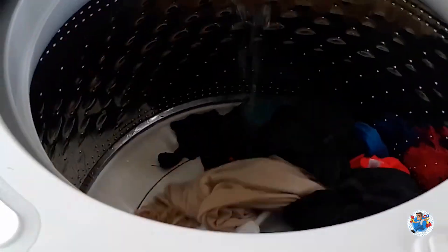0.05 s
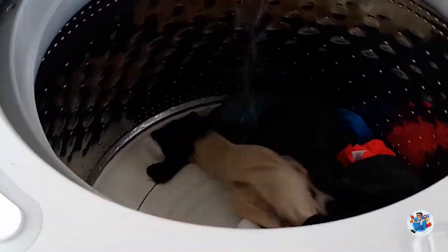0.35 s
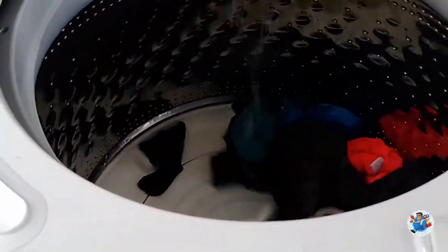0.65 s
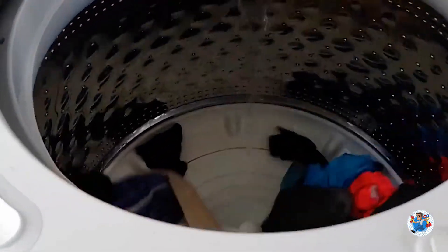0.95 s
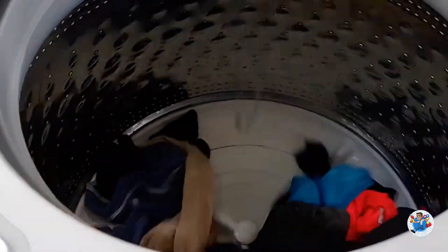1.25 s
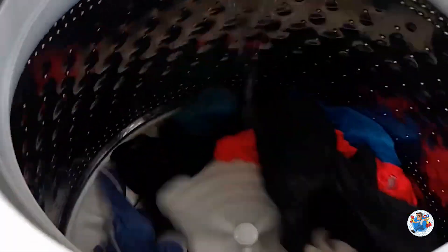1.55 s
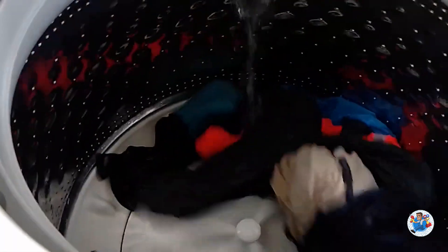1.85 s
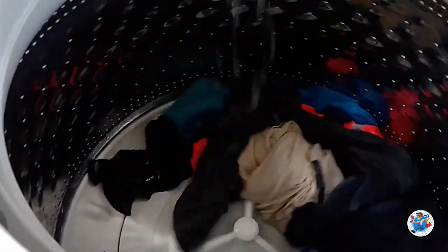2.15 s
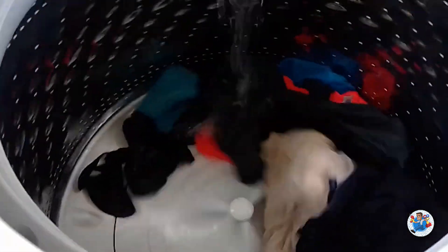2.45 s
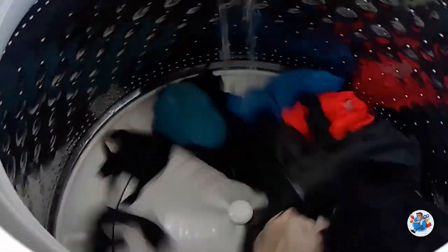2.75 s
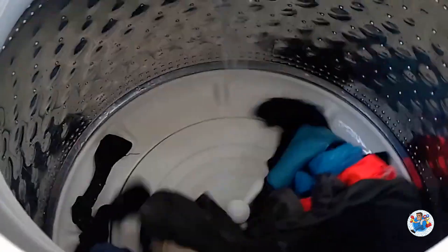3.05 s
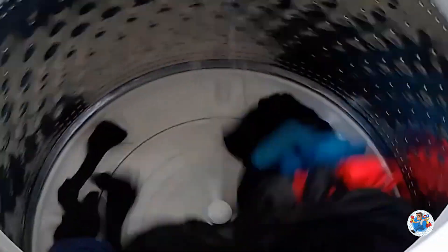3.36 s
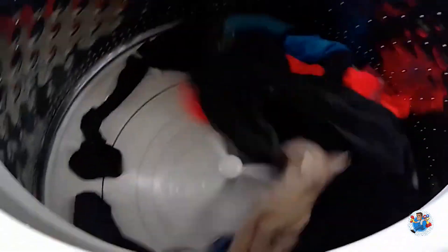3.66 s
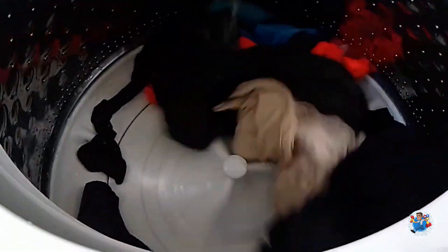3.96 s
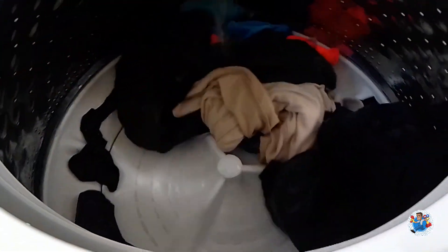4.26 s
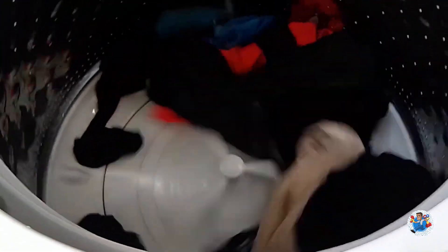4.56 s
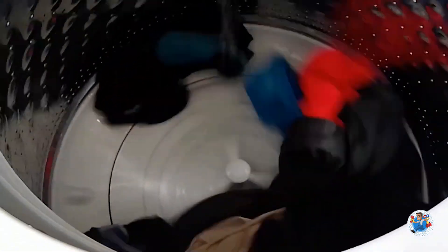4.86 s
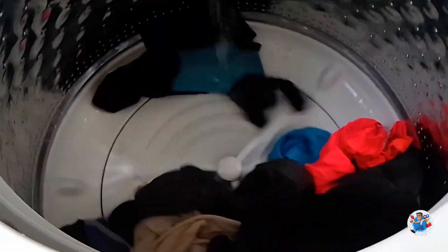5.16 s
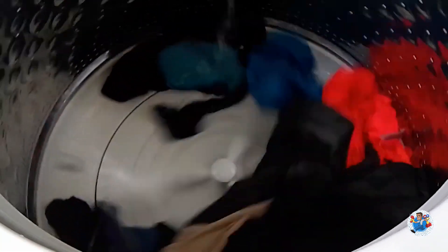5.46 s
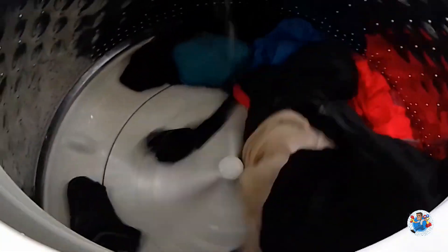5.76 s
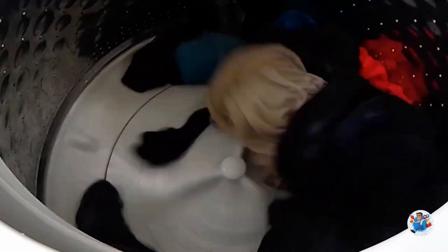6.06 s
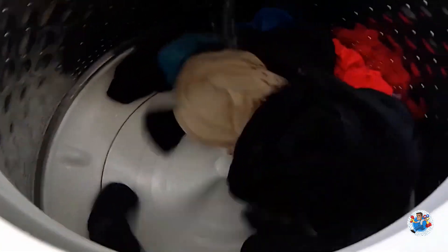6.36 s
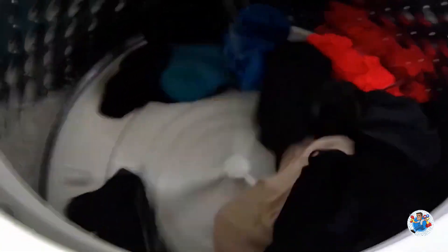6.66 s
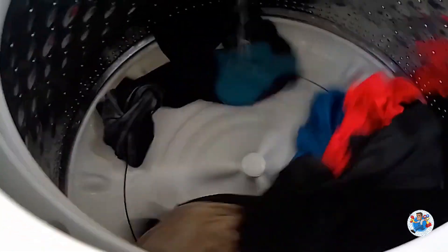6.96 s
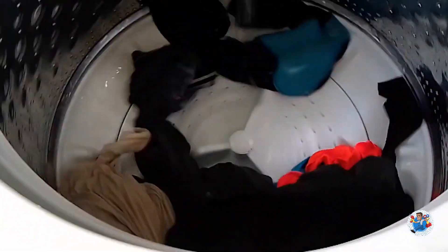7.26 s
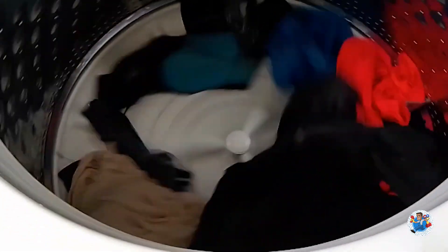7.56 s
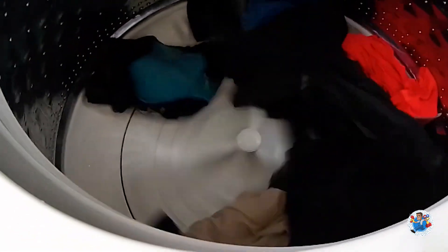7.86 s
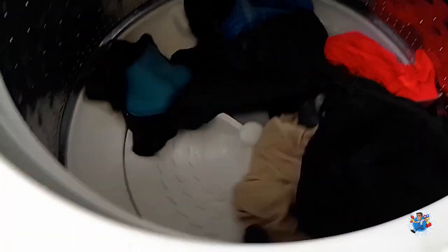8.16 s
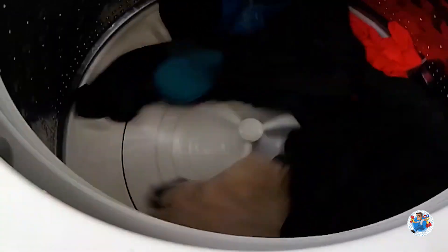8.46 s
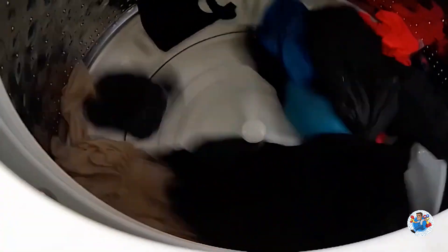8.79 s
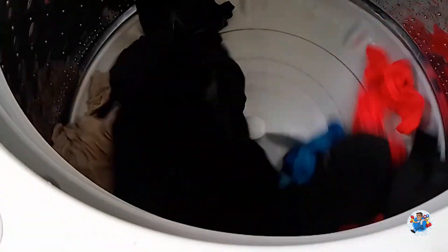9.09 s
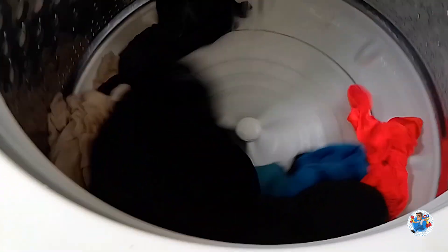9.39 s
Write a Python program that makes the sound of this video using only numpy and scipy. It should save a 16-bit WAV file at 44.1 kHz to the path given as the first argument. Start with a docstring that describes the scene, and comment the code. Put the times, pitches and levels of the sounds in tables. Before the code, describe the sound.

Water streams into a top-loading washing machine, pattering and slapping on wet clothes and the steel tub with tiny bubbly plips. Underneath, the motor drones and grinds in strokes about once a second, with light sloshing and a soft clunk at some reversals. Now and then wet laundry thuds dully against the wall. It is all heard from close above the open tub.

```python
"""Water pours into a top-loading washing machine. The stream breaks into drops that patter and slap
on wet clothes and the steel tub, trapping small bubbles that ring.
Underneath, the wash plate swings to and fro, one stroke a second. Its drive hums and grinds through
the tub and clunks when it reverses; the water sloshes, and now and then wet clothes thud on the wall."""
import sys
import numpy as np
from scipy import signal
from scipy.fft import rfft, irfft, next_fast_len
from scipy.io import wavfile
from scipy.ndimage import uniform_filter1d, minimum_filter1d

SR = 44100
rng = np.random.default_rng(int(sys.argv[2]) if len(sys.argv) > 2 else 0)


def dump_mix(stems):
    """Bounce the given channels to the path in sys.argv[1] as a 16-bit WAV at rate SR."""
    frames = np.atleast_2d(stems).T  # one column per channel
    limited = np.clip(frames, -1, 1)  # hard clip at full scale
    pcm = np.round(limited * 32767).astype(np.int16)
    wavfile.write(sys.argv[1], SR, pcm)


N = 420273

# each swing of the wash plate: (start [s], time driven [s], drone [dB], rasp [dB], clunk [dB])
STROKE_PLAN = [(-0.64, .71, -29, -32.5, -54), (0.362, .72, -27, -31.5, -52), (1.365, .72, -27.5, -31, -46),
               (2.366, .76, -26.5, -30, -46), (3.375, .72, -28.5, -31.5, -54),
               (4.362, .74, -28, -29.5, -44), (5.38, .7, -28, -30.5, -39), (6.378, .7, -28, -29, -49),
               (7.38, .7, -27, -30, -40), (8.379, .7, -26, -27.5, -58), (9.398, .7, -27, -30, -40)]
# the tone colour of the drive's rasp, heard through the tub: (frequency [Hz], level [dB])
RASP_COLOUR = [(300, -44), (440, -5), (505, 3), (555, -1), (595, 2), (660, 1.5), (735, -1.5), (770, -5.5),
               (1050, -6), (1300, -8.5), (2000, -11.5), (3500, -16.5), (8000, -50)]
# the tone colour of drops landing in shallow water: (frequency [Hz], level [dB])
PUDDLE_COLOUR = [(100, -60), (400, 2), (800, 16), (1500, 4), (2100, -0.5), (2800, 4.5), (3600, -1.5),
                 (5000, 10.5), (9000, -30), (16000, -30)]
# how loud the spray is as clothes pass under the stream: (time [s], level [dB])
SPRAY_LOUDNESS = [(0.0, -25.5), (0.16, -30.5), (0.28, -23.0), (0.6, -27.5), (1.04, -24.0), (1.4, -24.5),
                  (1.88, -28.5), (2.0, -24.0), (2.36, -29.5), (2.48, -24.5), (3.0, -28.0), (3.6, -21.0),
                  (3.68, -29.0), (4.4, -25.5), (5.0, -29.0), (5.56, -29.5), (5.68, -21.0), (6.4, -30.0),
                  (6.52, -25.0), (7.04, -28.0), (7.72, -23.5), (8.28, -27.0), (9.32, -23.5), (9.52, -27.0)]


def amp(db):
    """Turn decibels into a number to multiply by."""
    return np.exp(np.asarray(db) * np.log(10) / 20)


def unit(x):
    """Scale each sound to an average strength (rms) of 1."""
    return x / np.sqrt(np.mean(x ** 2, axis=-1, keepdims=True) + 1e-20)


def curve(points):
    """Join (time, value) points with straight lines, one value per sample."""
    return np.interp(np.arange(N) / SR, *np.transpose(points))


def wobble(rate):
    """A smooth curve through `rate` random values a second."""
    fine = signal.resample_poly(rng.standard_normal(int(N * rate / SR) + 4), 8, 1)
    return np.interp(np.arange(N) * 8 * rate / SR, np.arange(len(fine)), fine)


def gains(colour, size):
    """Turn (Hz, dB) points into a gain for every frequency in a sound of `size` samples."""
    hz, db = np.transpose(colour)
    return amp(np.interp(np.log(np.fft.rfftfreq(size, 1 / SR) + 1), np.log(hz), db))


def noise(colour):
    """Steady noise with the given tone colour."""
    size = next_fast_len(N)
    return unit(irfft(rfft(rng.standard_normal(size)) * gains(colour, size), size)[:N])


def tone(hz, drift, drift_rate):
    """A tone that wavers slightly; drift is how far its phase wanders, in radians."""
    return np.sqrt(2) * np.sin(2 * np.pi * hz * np.arange(N) / SR + drift * wobble(drift_rate))


def burst(t, rise, t60):
    """Swell to 1 in `rise` seconds, then fade by 60 dB every `t60` seconds."""
    return np.minimum(t / rise, 1) ** 2 * amp(-60 * np.maximum(t - rise, 0) / t60)


def place(times, sounds):
    """Add each row of sound at its time, which may be up to a second before the start."""
    at = np.round((np.asarray(times) + 1) * SR).astype(int)[:, None] + np.arange(sounds.shape[1])
    return np.bincount(at.ravel(), sounds.ravel(), N + SR)[SR:SR + N]


def impact_noise(colour, centre_hz, octaves, size=1536):
    """One row of noise per impact, stressed around its own centre frequency."""
    hz = np.fft.rfftfreq(size, 1 / SR) + 1
    stress = 1 / np.sqrt(1 + (np.log2(hz / centre_hz[:, None]) / octaves) ** 2)
    white = rng.standard_normal((len(centre_hz), size))
    return unit(irfft(rfft(white) * gains(colour, size) * stress))


def chirps(pitch_hz, cycles, glide, size=1024):
    """Bubbles ring, loudest after `cycles` vibrations, and glide upward through pitch_hz."""
    turns = pitch_hz[:, None] * np.arange(size) / SR
    age = turns / cycles
    rising = np.minimum(age, 2)
    phase = turns + glide * cycles * (rising ** 2 / 2 - rising + np.maximum(age - 2, 0))
    return age * np.exp(1 - age) * np.sin(2 * np.pi * phase)


def fizz(low_hz, span, cycles, spread_db, count):
    """A crowd of tiny bubbles, pitched from low_hz up to `span` times that."""
    when, pitch, size = rng.random((count, 3)).T
    rings = chirps(low_hz * span ** pitch, cycles, glide=0.12, size=640)
    return unit(place(when * N / SR, amp(spread_db * size ** 2)[:, None] * rings))


def plate_swing():
    """At each sample: the plate's speed (0-1), its stroke's age (s), drone (dB) and rasp (dB)."""
    spin_up_s, coast_s = .085, .26
    start, driven, drone_db, rasp_db, _ = np.transpose(STROKE_PLAN)
    t = np.arange(N) / SR
    stroke = np.maximum(np.searchsorted(start, t) - 1, 0)
    age = t - start[stroke]
    speed = np.clip(np.minimum(age / spin_up_s, 1 - (age - driven[stroke]) / coast_s), 0, 1)
    return speed, age, drone_db[stroke], rasp_db[stroke]


def water_motion():
    """How fast the shallow water moves (0-1): it starts after the plate and stops with it."""
    lag_s, surge_s = .06, .04
    speed, age, _, _ = plate_swing()
    return np.clip((age - lag_s) / surge_s, 0, speed)


def hum():
    """The motor and the inlet valve hum faintly the whole time."""
    # the tones of the hum: (pitch [Hz], level [dB])
    hum_tones = [(99, -65.5), (177, -67.5), (240, -54)]
    return sum(amp(db + 5.8 * wobble(5.5)) * tone(hz, drift=1.0, drift_rate=8) for hz, db in hum_tones)


def clunks():
    """Each reversal rocks the cabinet with a soft thump, never twice alike."""
    # the cabinet's own notes: (pitch [Hz], level [dB], time to fade by 60 dB [s])
    cabinet_notes = [(82, -5, 0.21), (99.6, 8, 0.18), (227.4, 1, .2), (295.5, 5, .15)]
    times, *_, clunk_db = np.transpose(STROKE_PLAN)
    t = np.arange(SR // 3) / SR
    swell = np.sin(np.pi / 2 * np.minimum(t / .035, 1)) ** 2
    chance = rng.standard_normal((len(times), len(cabinet_notes), 2))
    ring = 0
    for k, (hz, db, t60) in enumerate(cabinet_notes):
        strength, detune = chance[:, k, :1], chance[:, k, 1:]
        fade = amp(db + 2 * strength - 60 * t / t60)
        ring = ring + fade * np.sin(2 * np.pi * hz * (1 + 0.026 * detune) * t)
    return place(times - .01, amp(clunk_db + 4)[:, None] * swell * ring)


def thuds():
    """Wet clothes are flung against the tub and land with a dull smack."""
    # each landing: (time [s], level [dB], centre frequency [Hz])
    landings = [(0.66, -18, 1940), (1.449, -18, 554), (5.472, -26, 646), (5.984, -25, 557),
                (6.466, -15, 541), (8.692, -8, 867)]
    times, db, centre_hz = np.transpose(landings)
    body = impact_noise(RASP_COLOUR, centre_hz, octaves=0.17, size=4096)
    t = np.arange(body.shape[1]) / SR
    return place(times, amp(db - 5)[:, None] * body * burst(t, rise=0.002, t60=0.057))


def drive_levels():
    """Drone, rasp and whine in dB: the gears knock at each reversal, then get louder with speed."""
    # brief dips in the drive's noise: (time [s], half length [s], depth [dB])
    dips = [(1.55, .04, 13), (3.48, .07, 5), (3.93, .04, 5), (5.53, .04, 9), (7.03, .04, 6.5)]
    drone_rest_db, rasp_rest_db = -41, -43
    drag_s, drag_db, ease_db_per_s = .245, 4, 6  # the drone swells as clothes are dragged, then eases
    speed, age, stroke_drone_db, stroke_rasp_db = plate_swing()
    t = np.arange(N) / SR
    dip_db = sum(depth_db * np.exp(-((t - when) / half) ** 2) for when, half, depth_db in dips)
    load_db = drag_db * np.minimum(age / drag_s - 1, 0) - ease_db_per_s * np.maximum(age - drag_s, 0)
    drone_db = drone_rest_db + speed * (stroke_drone_db + load_db - drone_rest_db)
    rasp_db = rasp_rest_db + speed * (stroke_rasp_db - rasp_rest_db)
    knock_db = 20 * np.log10(burst(age, rise=.005, t60=.22) + 1e-9)
    drone_db = np.maximum(drone_db - dip_db + 1.7 * wobble(18), knock_db - 29)
    rasp_db = np.maximum(rasp_db - dip_db + 1.1 * wobble(18), knock_db - 35)
    sing_db = 6 * np.exp(-((speed - .88) / .12) ** 2)  # the gearbox sings near 88% of full speed
    whine_db = -39.5 + 1.2 * (rasp_db + 29) + sing_db + 3 * wobble(14)  # grows with the rasp
    return drone_db, rasp_db, whine_db


def drive():
    """The gears drone, whine and rasp, and the water sloshes as hard as the stroke goes."""
    # the tone colour of the drone, heard through the tub: (frequency [Hz], level [dB])
    drone_colour = [(30, -40), (60, -40), (100, -23.5), (155, -34.5), (195, -24.5), (232, -5.5), (268, -9),
                    (305, 0.5), (335, -1), (370, -7), (410, -7.5), (470, -26.5), (800, -69)]
    # the gears' tones within the drone: (pitch [Hz], level [dB])
    gear_tones = [(120, -28), (240, -13.5), (333, -8.5), (655, -16.5), (677, -21.5), (841, -19),
                  (1009, -18)]
    drone_db, rasp_db, whine_db = drive_levels()
    swish_db = 6 * (water_motion() - 1)  # quieter until the water moves
    gears = sum(amp(db + 1.23 * wobble(25)) * tone(hz, drift=1.4, drift_rate=15) for hz, db in gear_tones)
    drone = amp(drone_db) * (amp(-1.5) * noise(drone_colour) + amp(.4) * gears)
    whine = amp(whine_db) * tone(hz=554, drift=1.64, drift_rate=22)
    # below 950 Hz the rasp is grinding gears; above, it is swishing water
    rough = noise(RASP_COLOUR)
    grind = signal.sosfiltfilt(signal.butter(3, 950, fs=SR, output="sos"), rough)
    rasp_gain = amp(rasp_db - 2.8 + 1.46 * wobble(60))
    swish = amp(swish_db + 1.5 * wobble(30)) * (rough - grind)
    slosh = amp(rasp_db + swish_db - 10) * fizz(900, span=2.61, cycles=2.65, spread_db=16, count=1000)
    return drone + whine + rasp_gain * (grind + swish) + slosh


def tub_echo(water, t60, echo_db, size=4096):
    """The tub adds a very short, diffuse echo with no fixed pitch."""
    pieces = np.pad(water, (0, -N % size)).reshape(-1, size)
    fade = burst(np.arange(size) / SR, rise=0.0032, t60=t60)
    tails = unit(rng.standard_normal(pieces.shape) * fade) / np.sqrt(size)
    echoes = signal.fftconvolve(pieces, tails, axes=1)
    return water + amp(echo_db) * place(np.arange(len(pieces)) * size / SR, echoes)


def bubbles():
    """A wet splash traps a bubble: large ones plop at a nearly steady pitch, small ones chirp upward."""
    # drops that trap a bubble: (time [s], level [dB], pitch [Hz])
    plops = [(0.2304, -4, 4150), (0.3678, -12, 4300), (0.416, -24, 2900), (0.4324, -12, 2780),
             (0.4813, -17, 4090), (0.7287, -18, 4050), (0.9363, -16, 2200), (1.3214, -19, 2720),
             (1.3862, -22, 2420), (1.403, -11, 4300), (1.502, -22, 2300), (1.6184, -21, 2480),
             (1.6826, -20, 3230), (1.924, -18, 3500), (2.4628, -12, 4200), (2.5162, -15, 2980),
             (2.6755, -10, 3600), (2.8754, -13, 3080), (3.1405, -18, 3370), (3.4224, -19, 2950),
             (3.5703, -12, 2700), (3.6, -8, 4300), (3.7289, -16, 4300), (4.0601, -9, 4200),
             (4.3565, -17, 4300), (4.3856, -10, 4340), (4.4049, -14, 3970), (5.2224, -20, 2580),
             (5.9025, -16, 2530), (6.137, -18, 2700), (6.2203, -10, 2790), (6.374, -17, 2990),
             (6.905, -13, 4380), (7.066, -17, 3380), (7.2473, -9, 3000), (7.7762, -20, 2830),
             (8.3928, -13, 4400), (8.4713, -12, 4200)]
    times, db, pitch_hz = np.transpose(plops)
    glide = np.minimum(.24 * (pitch_hz[:, None] / 3500) ** 2, .55)
    ring = chirps(pitch_hz, cycles=3.3, glide=glide)
    t = np.arange(ring.shape[1]) / SR
    hiss = impact_noise(PUDDLE_COLOUR, pitch_hz * .8, octaves=0.23, size=len(t))
    splash = hiss * burst(t, rise=0.00077, t60=0.031)
    return place(times, amp(db + 1)[:, None] * (ring + amp(-10) * splash))


def lighter_drops(count):
    """Random extra drops for slaps(), hitting harder where the spray is louder."""
    jitter, size, brightness = rng.standard_normal((count, 3)).T
    times = np.clip((np.arange(count) + .5 + .35 * jitter) / count, 0, 1) * N / SR
    crack_db = np.interp(times, *np.transpose(SPRAY_LOUDNESS)) + 9 + 2 * size
    centre_hz = 9000 * np.exp(.15 * brightness)
    spray_db = crack_db - 17
    return np.transpose([times, crack_db, centre_hz, spray_db])


def slaps():
    """A fat drop cracks on the cloth, squeezes out a tiny rising bubble and throws up a brief spray."""
    # the fattest drops: (time [s], crack [dB], centre frequency [Hz], spray [dB])
    fat_drops = [(0.0165, -10, 7200.0, -35), (0.0275, -7, 8400.0, -32), (0.2099, -11, 10100.0, -17),
                 (0.231, -5, 4600.0, -19), (0.3693, -6, 5800.0, -31), (0.3823, -7, 9800.0, -32),
                 (0.4479, -7, 8100.0, -32), (0.5406, -10, 8400.0, -35), (0.5696, -9, 8900.0, -26),
                 (0.6987, -6, 8000.0, -19), (0.7348, -8, 9300.0, -21), (0.8152, -3, 7900.0, -14),
                 (0.8796, -5, 10900.0, -23), (0.977, -9, 10400.0, -34), (1.0046, -7, 8400.0, -32),
                 (1.014, -7, 8600.0, -32), (1.0526, -9, 9700.0, -34), (1.0815, -5, 9500.0, -19),
                 (1.1148, -9, 8400.0, -23), (1.2103, -6, 8700.0, -31), (1.2259, -3, 8000.0, -19),
                 (1.3212, -6, 10500.0, -31), (1.3867, -6, 8600.0, -24), (1.4054, -3, 7300.0, -27),
                 (1.421, -10, 10500.0, -35), (1.4364, -4, 10200.0, -11), (1.5329, -11, 10400.0, -36),
                 (1.5434, -7, 8700.0, -24), (1.6826, -5, 10600.0, -25), (1.8457, -8, 8600.0, -33),
                 (2.1398, -9, 9200.0, -34), (2.43, -7, 7600.0, -21), (2.4846, -10, 7500.0, -35),
                 (2.6752, -5, 6700.0, -22), (2.685, -9, 8700.0, -19), (2.7399, -7, 8400.0, -21),
                 (2.7644, -10, 7500.0, -26), (3.0033, -6, 11600.0, -31), (3.1446, -7, 9800.0, -32),
                 (3.1955, -6, 9000.0, -19), (3.2868, -9, 12200.0, -34), (3.2972, -6, 10300.0, -31),
                 (3.3208, -6, 10500.0, -19), (3.3446, -8, 10600.0, -33), (3.3596, -8, 9900.0, -25),
                 (3.4223, -8, 9300.0, -26), (3.5184, -8, 9700.0, -23), (3.5357, -5, 9000.0, -16),
                 (3.5704, -8, 7000.0, -33), (3.5804, -9, 7700.0, -34), (3.6019, -2, 5700.0, -14),
                 (3.613, -8, 9400.0, -17), (3.6382, -6, 5700.0, -31), (3.748, -7, 8800.0, -32),
                 (3.7919, -9, 9400.0, -25), (3.9145, -8, 9900.0, -20), (4.0202, -11, 9200.0, -29),
                 (4.0541, -6, 7200.0, -13), (4.0906, -9, 10100.0, -24), (4.4705, -4, 9300.0, -21),
                 (4.4984, -8, 8100.0, -33), (4.8865, -11, 10000.0, -24), (5.0006, -3, 9100.0, -13),
                 (5.0707, -10, 6300.0, -23), (5.0794, -9, 6700.0, -34), (5.1454, -9, 7500.0, -24),
                 (5.4608, -12, 8200.0, -15), (5.4747, -8, 9300.0, -24), (5.5255, -8, 10500.0, -33),
                 (5.6326, -8, 9500.0, -13), (5.8659, -9, 8900.0, -34), (5.9104, -3, 8300.0, -17),
                 (6.0544, -8, 8100.0, -20), (6.5478, -7, 9800.0, -32), (6.7794, -8, 9400.0, -23),
                 (6.795, -7, 8700.0, -24), (6.819, -8, 8300.0, -21), (6.9151, -5, 9200.0, -16),
                 (7.3591, -7, 8700.0, -21), (7.444, -7, 8900.0, -24), (7.4811, -10, 9200.0, -35),
                 (7.5402, -6, 9500.0, -31), (7.548, -6, 8500.0, -17), (7.6447, -9, 8400.0, -34),
                 (7.6836, -7, 9800.0, -32), (7.7137, -9, 6300.0, -13), (7.766, -5, 9200.0, -25),
                 (7.8727, -10, 9800.0, -18), (8.0351, -7, 8400.0, -11), (8.9977, -6, 8900.0, -26),
                 (9.01, -9, 6700.0, -24), (9.0251, -9, 10500.0, -28), (9.1015, -8, 9900.0, -18),
                 (9.2168, -9, 12400.0, -34), (9.3577, -3, 9900.0, -28), (9.5089, -5, 9900.0, -30)]
    # the tone colour of a slap on wet cloth: (frequency [Hz], level [dB])
    slap_colour = [(300, -50), (900, -25), (1600, 0), (2800, -4.5), (5000, -3), (9500, 2), (12000, -0.5),
                   (16000, -3)]
    times, crack_db, centre_hz, spray_db = np.vstack([fat_drops, lighter_drops(count=70)]).T
    hiss = impact_noise(slap_colour, centre_hz, octaves=0.39)
    t = np.arange(hiss.shape[1]) / SR
    squeak = chirps(.7 * centre_hz, cycles=5.42, glide=0.36, size=len(t))
    snap = hiss * burst(t, rise=0.00099, t60=0.0054)
    crack = amp(crack_db + .5)[:, None] * (snap + amp(-7.5) * squeak)
    spray = amp(spray_db)[:, None] * hiss * burst(t, rise=0.0034, t60=0.052)
    return place(times, crack) + place(times, spray) * amp(3 * wobble(600))


def patter(colour, centre_hz, spread_db, tick_t60, tail_db, tail_t60, grain_db, count):
    """Many small drops: each a tick and a puff of spray that falls as separate droplets."""
    jitter, size, length, softness = rng.random((count, 4)).T
    times = (np.arange(count) + 6 * jitter - 3) * N / SR / count
    hiss = impact_noise(colour, centre_hz * np.exp(0.5 * rng.standard_normal(count)), octaves=0.33)
    t = np.arange(hiss.shape[1]) / SR
    rise = .0008 + .006 * softness[:, None] ** 2
    tick = burst(t, rise, tick_t60)
    puff = amp(tail_db) * burst(t, 2 * rise, tail_t60 * (.5 + length[:, None]))
    drops = amp(spread_db * size ** 2)[:, None] * (tick + puff) * hiss
    return unit(place(times, drops) * amp(grain_db * wobble(700)))


def stream():
    """Fine drops patter on cloth and steel, duller ones in the shallow water that each stroke stirs."""
    # the tone colour of the fine spray: (frequency [Hz], level [dB])
    spray_colour = [(150, -70), (1000, -37), (3000, -9.5), (5000, -7), (7500, -1), (9500, 3.5),
                    (12000, -1.5), (16000, -6.5)]
    # how loud the drops in the shallow water are: (time [s], level [dB])
    puddle_loudness = [(0.0, -37.0), (0.52, -34.5), (0.68, -32.5), (1.32, -41.0), (2.24, -34.5),
                       (2.4, -50.5), (2.48, -34.0), (2.88, -33.5), (3.36, -45.5), (3.6, -32.5),
                       (3.92, -38.0), (5.08, -37.0), (5.4, -47.0), (5.68, -31.5), (6.2, -32.5),
                       (6.32, -50.0), (6.48, -38.0), (6.92, -35.0), (7.36, -44.5), (7.48, -37.0),
                       (8.0, -32.5), (8.32, -40.0), (8.48, -31.5), (9.0, -34.0), (9.24, -50.0),
                       (9.52, -38.0)]
    stir_db = 4 * (water_motion() - 1)  # quieter while the water is still
    fine = patter(spray_colour, centre_hz=8460, spread_db=10.5, tick_t60=0.0078,
                  tail_db=-11.5, tail_t60=0.043, grain_db=3.5, count=1100)
    dull = patter(PUDDLE_COLOUR, centre_hz=4070, spread_db=14, tick_t60=0.013,
                  tail_db=-7, tail_t60=0.054, grain_db=-1.0, count=650)
    plips = fizz(2557, span=3.34, cycles=2.7, spread_db=18.5, count=1700)
    flutter_db = 3 * wobble(45)
    spray = amp(-1) * fine + amp(-7.3 + flutter_db) * noise(spray_colour)
    puddle = amp(-2.5) * dull + amp(flutter_db) * (amp(-4.5) * plips + amp(-8) * noise(PUDDLE_COLOUR))
    return amp(curve(SPRAY_LOUDNESS)) * spray + amp(curve(puddle_loudness) + stir_db) * puddle


def scene():
    """Water falling into the tub and the machine working beneath it, in one channel."""
    water = tub_echo(stream() + slaps() + bubbles(), t60=0.094, echo_db=-9)
    # drops are too small to give off bass
    water = signal.sosfilt(signal.butter(4, 300, "highpass", fs=SR, output="sos"), water)
    return (water + thuds() + drive() + hum() + clunks())[None]


def record(dry):
    """A fast limiter turns the loudest drops down to full scale; the highest treble is cut off."""
    top_hz = 16000
    needed_gain = 1 / np.maximum(np.abs(dry), 1)
    limited = dry * uniform_filter1d(minimum_filter1d(needed_gain, size=31), size=31)
    size = next_fast_len(N + SR // 2)
    kept = np.fft.rfftfreq(size, 1 / SR) < top_hz
    return irfft(rfft(limited, size) * kept, size)[..., :N]


dry = scene()
out = record(dry)
dump_mix(out)
```